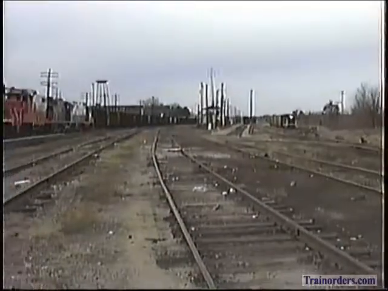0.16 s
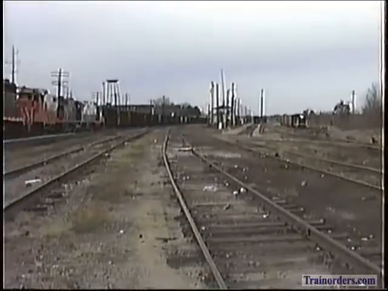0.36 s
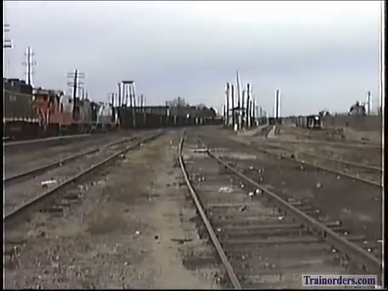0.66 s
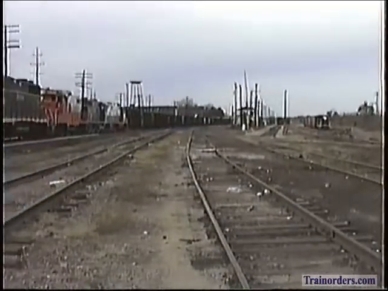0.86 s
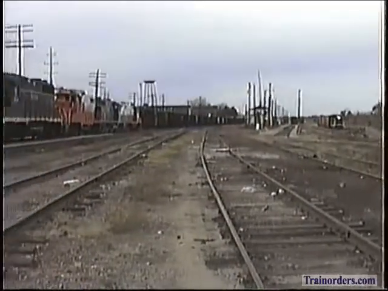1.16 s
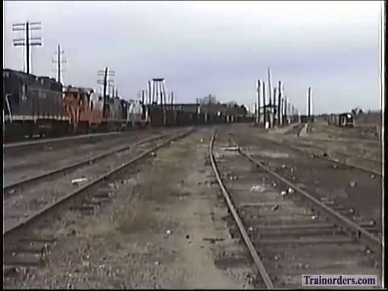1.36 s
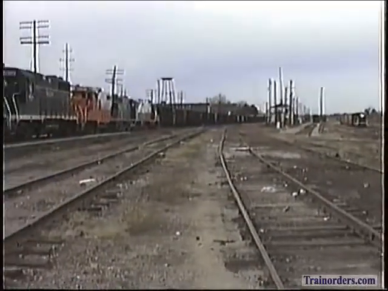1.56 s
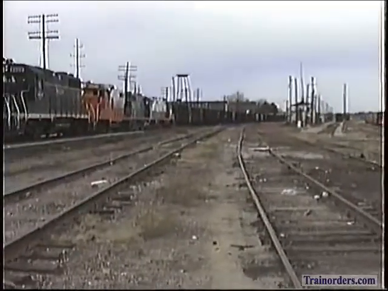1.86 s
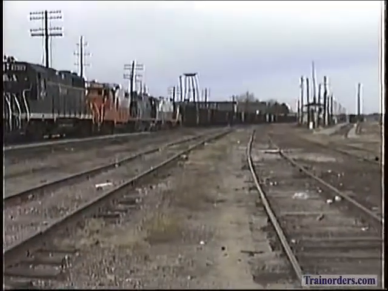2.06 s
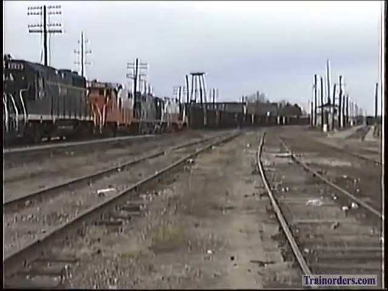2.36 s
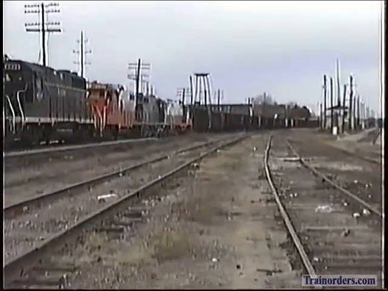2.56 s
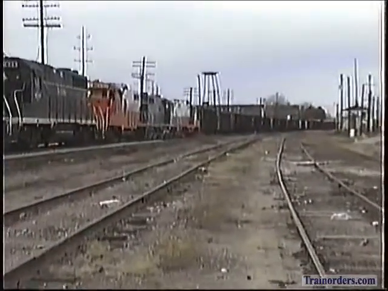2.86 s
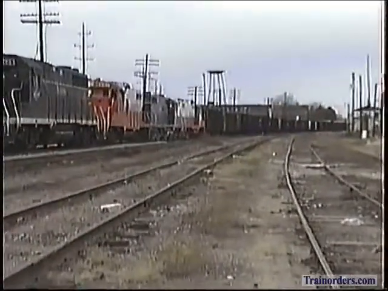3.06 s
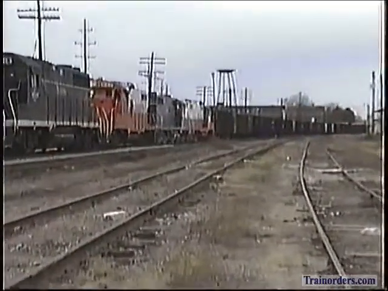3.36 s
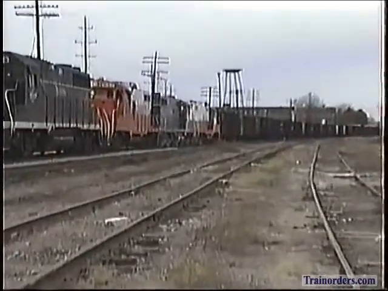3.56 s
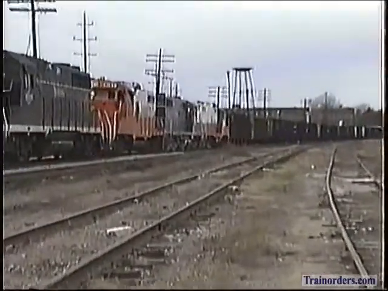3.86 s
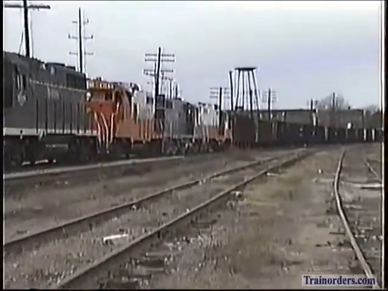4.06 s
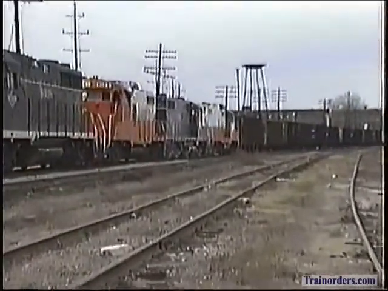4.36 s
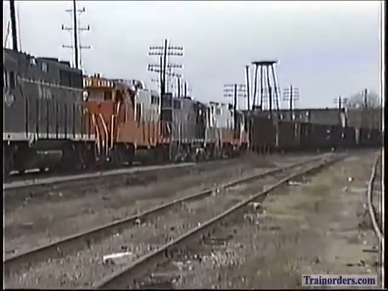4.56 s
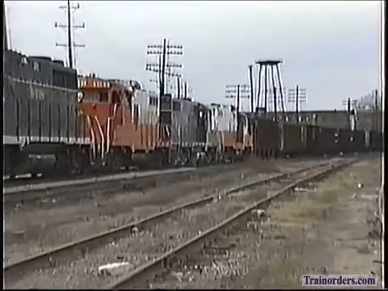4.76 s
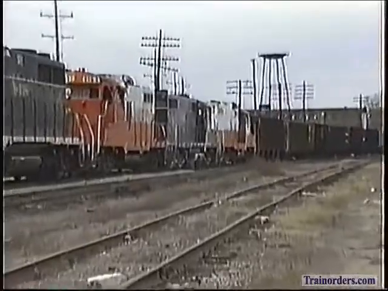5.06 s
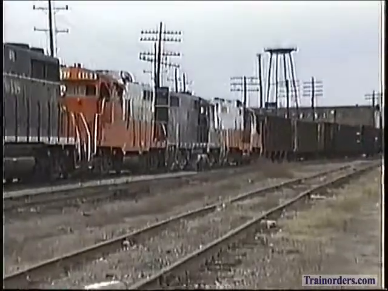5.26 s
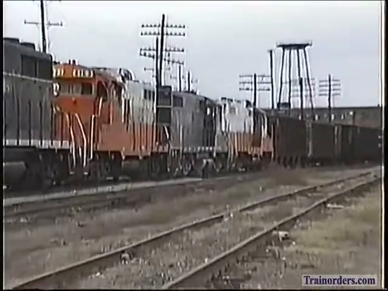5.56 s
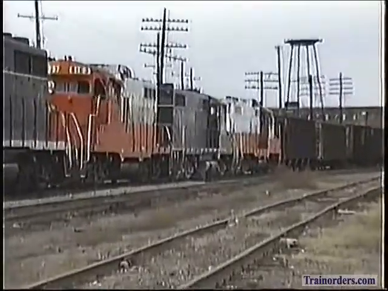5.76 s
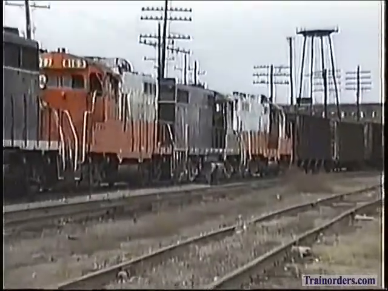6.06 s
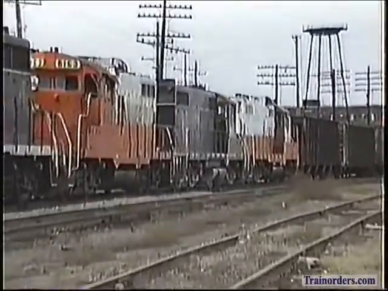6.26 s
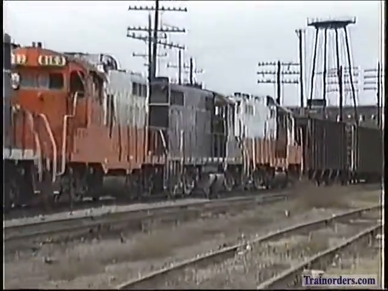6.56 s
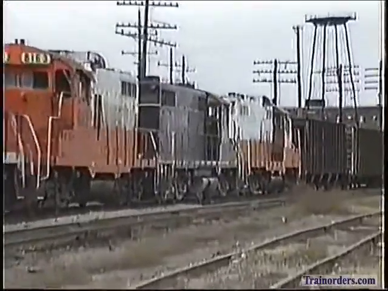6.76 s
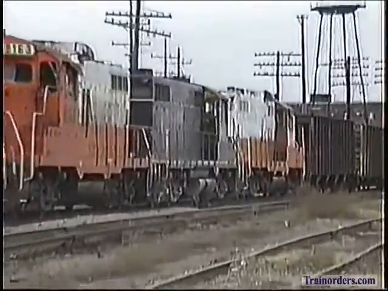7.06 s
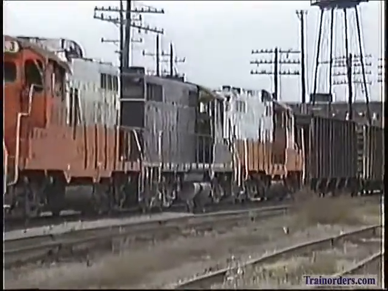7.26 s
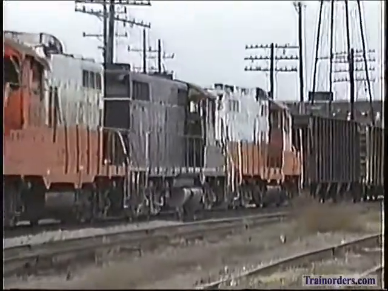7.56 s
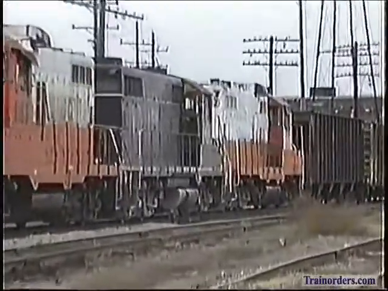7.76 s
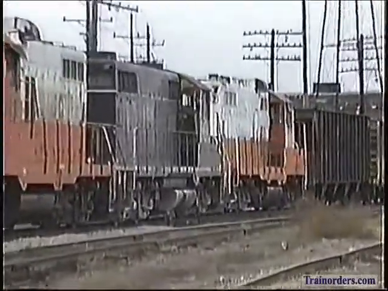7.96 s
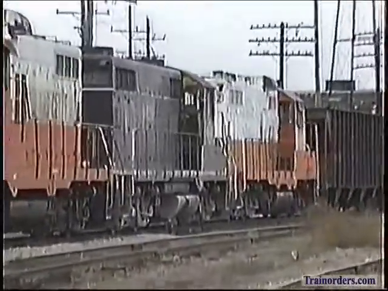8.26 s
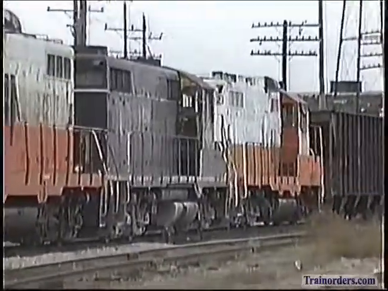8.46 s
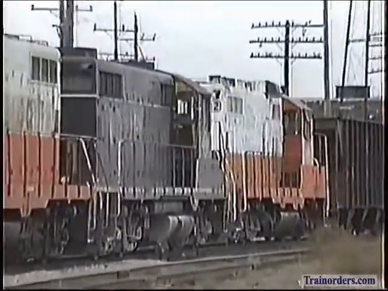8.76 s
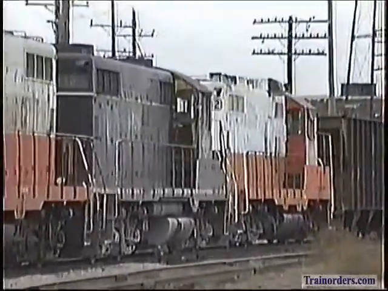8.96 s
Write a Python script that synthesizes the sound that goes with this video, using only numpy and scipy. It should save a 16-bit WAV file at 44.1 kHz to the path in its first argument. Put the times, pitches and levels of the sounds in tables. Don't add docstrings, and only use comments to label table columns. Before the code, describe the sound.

Idling diesel locomotives throb and whine with a steady chug and metallic pinging as gusty wind thumps the microphone, swelling louder as they creep nearer.

```python
import sys
import numpy as np
from scipy import signal
from scipy.fft import rfft, irfft, next_fast_len
from scipy.io import wavfile
from scipy.ndimage import uniform_filter1d, map_coordinates

SR = 44100
rng = np.random.default_rng(int(sys.argv[2]) if len(sys.argv) > 2 else 0)


def int16_out(signal):
    q = np.round(np.clip(np.atleast_2d(signal).T, -1, 1) * 32767)
    wavfile.write(sys.argv[1], SR, q.astype(np.int16))


def level_to_linear(level):
    exponent = np.asarray(level, float) / 20
    return 10 ** exponent


N = 402633

# (frequency [Hz], density [dB per Hz])
HISS_COLOUR = [(2000, -40), (4500, -1.5), (5800, .3), (8300, -.8), (10000, -2.3), (11000, -4.5),
               (12500, -5), (13780, -7)]
# (frequency [Hz], level [dB])
ELECTRONICS = [(6955, -82), (8000, -81), (8393, -82), (9351, -84), (9830, -83), (10072, -84), (12435, -88),
               (13151, -91)]
# (frequency [Hz], density [dB per Hz])
THUMP_COLOUR = [(17, -64), (28, -13.5), (40, -2), (62, -0.5), (90, -5), (125, -13), (190, -54)]
# (frequency [Hz], density [dB per Hz])
FLUTTER_COLOUR = [(60, -39), (110, 2), (150, -5), (210, -4), (280, -15), (400, -18.5), (520, -50)]
# (time [s], thump [dB], flutter [dB], half length [s])
GUSTS = [(0.073, -20, -22.5, 0.13), (0.42, -52, -27, 0.03), (0.702, -50, -35, 0.13),
         (1.087, -25.5, -26, 0.17), (1.445, -33, -55, 0.12), (1.717, -42, -35, 0.13),
         (2.11, -29, -34, 0.13), (2.27, -31, -25, 0.071), (2.55, -47, -31, .04), (2.667, -20, -41, 0.019),
         (2.7, -35, -27, 0.025), (2.842, -17.5, -26.5, 0.13), (3.02, -40, -29, 0.039),
         (3.116, -32, -38, 0.046), (3.197, -50, -34, 0.045), (3.335, -25, -43, 0.11),
         (3.567, -21, -32, 0.069), (3.777, -32, -48, 0.059), (3.895, -23, -27, 0.044),
         (4.093, -34, -39, 0.13), (4.724, -42, -35, 0.11), (4.954, -34, -46, 0.071),
         (5.106, -15.5, -24, 0.043), (5.555, -31.5, -44, 0.18), (5.9, -43, -61, 0.34),
         (6.186, -31, -52, 0.038), (6.444, -30.5, -67, 0.18), (6.838, -28, -27, 0.023),
         (7.062, -23, -26, 0.04), (7.615, -32, -36, 0.17), (7.96, -26, -29, 0.08), (8.35, -34, -50, 0.038),
         (8.54, -31, -33, 0.047), (8.67, -26, -39, 0.034), (8.745, -45, -24, .035),
         (9.014, -32, -24.5, 0.19)]
# (time of peak [s], peak level [dB], frequency [Hz])
SLAPS = [(0.032, -20, 90), (0.091, -9, 105), (0.121, -18, 71), (0.957, -13.5, 94), (1.018, -18, 72),
         (1.125, -15, 82), (1.176, -13, 80), (1.247, -28, 92), (1.293, -17, 91), (1.374, -21, 60),
         (1.48, -18, 72.5), (1.624, -22, 111), (1.759, -19, 69.5), (2.051, -17, 98), (2.142, -13, 87),
         (2.271, -18, 77), (2.582, -16, 78), (2.671, -15, 74), (2.75, -17, 71.5), (2.848, -16, 76),
         (2.958, -20, 60), (3.103, -15, 58), (3.288, -20, 73), (3.566, -15, 65), (3.644, -16, 84),
         (3.891, -19, 100), (3.989, -18, 86), (4.091, -21, 86), (4.124, -22, 103), (4.295, -19.5, 82),
         (4.559, -22, 88), (5.012, -24, 79), (5.083, -20, 103), (5.112, -13, 101), (5.524, -20, 63),
         (5.618, -23, 84), (5.699, -20, 90), (5.78, -24, 77), (6.001, -17, 68), (6.32, -14.5, 69),
         (6.496, -19, 69), (6.626, -25, 81), (6.836, -20, 86), (7.058, -21, 85), (7.09, -17, 68),
         (7.413, -24, 101), (7.56, -16.5, 96), (7.641, -25, 89), (7.885, -24, 81), (7.937, -18.5, 118),
         (8.019, -19, 87), (8.1, -22, 94), (8.356, -23, 70), (8.504, -20, 102), (8.554, -20, 114),
         (8.581, -26, 90), (8.685, -21, 75), (8.916, -17, 92), (9.069, -16, 101), (9.092, -26, 88)]
# (time of peak [s], peak level [dB], frequency [Hz])
EDGE_SWINGS = [
    (0.007, -11, 62),
    (9.13, -12, 70),
]
# (time [s], level [dB])
SCRAPES = [
    (5.75, -56),
    (5.968, -52),
    (6.19, -56),
    (6.42, -60),
]
# (time [s], level [dB])
ENGINE_LOUDNESS = [(0.03, -33.5), (0.1, -36), (1.77, -31), (2.32, -31), (2.4, -29.5), (2.73, -29.5),
                   (2.78, -33.5), (3.11, -36), (3.64, -35.5), (4.8, -32.5), (6.1, -31), (7.71, -28),
                   (8.14, -26.5), (8.67, -27), (9.1, -26)]
# (time [s], speed [rpm])
SHAFT_SPEED = [(0.9, 275.914), (2.1, 275.984), (3.3, 275.936), (4.5, 275.905), (5.7, 275.886),
               (6.9, 275.956), (8.1, 275.853)]
# (frequency [Hz], level re engine [dB], unsteadiness [dB])
FANS = [(1507, -28, 2.5), (2158.2, -33.5, 1), (1890, -35, 2), (4640, -48, 4)]
# (frequency [Hz], density [dB per Hz])
ROAR_COLOUR = [(40, -74), (130, -2), (250, -6.5), (340, -5.5), (470, -11), (590, -8.5), (720, -5),
               (860, -13.5), (1150, -12.5), (1350, -18.5), (1600, -21), (2080, -19.5), (2400, -26.5),
               (3600, -48)]
# (frequency [Hz], density [dB per Hz])
CLATTER_COLOUR = [(1200, -50), (2300, -3), (2700, 0), (3100, -1.8), (3500, -.8), (4200, -7.5), (4650, -6.5),
                  (5000, -13), (6500, -18.5), (9000, -21), (13700, -27)]
# (start [turn], length [turns], level over the clatter [dB])
PUFFS = [
    (0.352, 0.11, -5),
    (0.91, 0.065, -4.5),
    (0.523, 0.061, -9),
]
# (time [s], level over the air noise [dB])
BLASTS = [
    (2.71, -7),
    (5.1, -10),
    (5.76, -11),
    (5.96, -11),
    (6.19, -13),
    (6.42, -12),
    (9.0, -10),
]
# (turn number, level [dB])
ODD_PINGS = [(0, -8), (1, 5), (2, -7), (4, -7), (5, -14), (7, -1), (10, -9), (11, -5), (12, -2), (13, 0),
             (14, -5), (16, -12), (18, -2), (20, -6), (21, 1), (22, -9), (23, -5), (24, -14), (25, -14),
             (26, -6), (28, 2), (29, 1), (30, -12), (31, -10), (32, -14), (33, -6), (34, -5), (35, -2),
             (38, -9), (39, -7), (41, -6)]
# (multiple of shaft speed, level re engine [dB])
BLOCK_TONES = [(30, -21), (32, -17.7), (35, -22), (37, -21), (40, -21), (47, -19.5), (60, -18.8),
               (66, -20.1), (83, -19.6), (85, -19.1), (87, -20.3), (88, -22.6), (93, -21.8), (97, -21.1),
               (105, -21.5), (115, -23.1), (117, -18.4), (125, -28), (127, -23), (128, -19.9), (129, -20.8),
               (130, -22.6), (131, -21), (136, -21.5), (137, -23.2), (141, -21.3), (148, -25), (149, -27),
               (156, -19.7), (157, -25.5), (160, -24), (168, -25), (173, -23.5), (174, -22), (179, -24),
               (184, -27)]
# (frequency [Hz], level of each re engine [dB])
BLOCK_FILL = [(60, -18.5), (200, -25.5), (370, -40.5), (560, -22), (790, -38), (1050, -43.5), (1350, -39.5),
              (1700, -48.5), (2300, -63), (3500, -59), (6000, -110)]
# (multiple of shaft speed, level re engine [dB], swell [0-1], loudest at [turn], waver [rad])
GEARS = [(79, -15.3, .25, .84, 0), (151, -13.3, .45, .22, .9), (158, -22.5, .2, .39, -.7),
         (161, -13.8, .33, .99, .45)]
# (multiple of shaft speed, level re whine [dB], swell [0-1],
# loudest at [turn], waver [rad])
MESH_OVERTONES = [(237, -3.5, .45, .66, 0), (316, -.8, .3, .56, 0), (395, -10.5, .4, .64, 0),
                  (474, -12, .15, .32, 0), (553, -16, .15, .19, 0)]
# (time [s], level [dB], frequency [Hz])
GLINTS = [(1.825, -72, 14000), (1.825, -72, 14400), (2.385, -65, 14900), (6.397, -64, 14920),
          (7.298, -68, 14300), (7.49, -67, 14100), (7.49, -67, 14450), (7.49, -65, 14920),
          (8.19, -70, 14200), (8.32, -64, 14900), (9.018, -72, 14050)]
# (frequency [Hz], difference [dB])
BALANCE = [(40, 1.4), (107, .4), (260, -1.2), (690, -2), (1700, -2.4), (3200, -2), (4300, -.9), (6000, -.1),
           (14000, -.2)]
# (frequency [Hz], phase lead [rad])
PHASE_LEAD = [(40, -.16), (150, -.23), (260, -.19), (690, -.09), (1700, -.04), (6000, 0)]
# (frequency [Hz], level [dB])
UNSHARED = [(60, -24), (300, -23), (700, -26), (1700, -17), (3200, -14), (4300, -11), (6000, -14.5),
            (8000, -21), (10000, -20), (12000, -10), (13400, -12)]
OFFSET = [
    [.1231],
    [.1226],
]


def unit(x):
    return x / np.sqrt(np.mean(x ** 2) + 1e-20)


def along(points, hz):
    f, value = np.transpose(points)
    return np.interp(np.log(hz + 1), np.log(f + 1), value)


def over_time(rows):
    s, value = np.transpose(rows)
    return np.interp(np.arange(N) / SR, s, value)


def wobble(rate_hz):
    coarse = np.arange(0, N + 128, 128)
    knots = rng.standard_normal(int(N * rate_hz / SR) + 5)
    return np.interp(np.arange(N), coarse, map_coordinates(knots, [coarse * rate_hz / SR]))


def swells(s, db, half_s):
    t = np.arange(0, N + 128, 128) / SR
    bells = level_to_linear(db)[:, None] * np.exp(-((t - s[:, None]) / np.reshape(half_s, (-1, 1))) ** 2)
    return np.interp(np.arange(N) / SR, t, bells.sum(axis=0))


def filtered(x, response):
    m = next_fast_len(N + 8192)
    return irfft(rfft(x, m) * response(np.fft.rfftfreq(m, 1 / SR)), m)[..., :N]


def noise(colour):
    low_hz, high_hz = colour[0][0], colour[-1][0]

    def response(hz):
        return level_to_linear(along(colour, hz)) * (hz > low_hz) * (hz < high_hz)

    return unit(filtered(rng.standard_normal(N), response))


def even(x, seconds):
    level = np.abs(uniform_filter1d(x ** 2, int(seconds * SR))) + .05
    return unit(x / level ** .3)


def follows(level_db, share):
    return level_db + share * (over_time(ENGINE_LOUDNESS) + 33)


def tape_hiss():
    return level_to_linear(follows(-60.7, share=.4)) * noise(HISS_COLOUR)


def electronics_buzz():
    t = np.arange(N) / SR
    return sum(level_to_linear(db - 1) * np.sin(2 * np.pi * hz * t) for hz, db in ELECTRONICS)


def slaps(cycles):
    t, out = np.arange(N) / SR, np.zeros(N)
    for peak_s, db, hz in SLAPS + EDGE_SWINGS:
        start_s = peak_s - cycles / hz
        near = slice(max(round(start_s * SR), 0), round((start_s + .15) * SR))
        u = (t[near] - start_s) * hz
        envelope = u / cycles * np.exp(1 - u / cycles)
        out[near] += level_to_linear(db) * np.sin(2 * np.pi * u) * envelope
    return out


def wind():
    s, thump_db, flutter_db, half_s = np.transpose(GUSTS)
    thump_gain = level_to_linear(-32.5) + swells(s, thump_db, half_s)
    flutter_gain = level_to_linear(-35.5) + swells(s, flutter_db, half_s)
    thump = thump_gain * even(noise(THUMP_COLOUR), seconds=0.035)
    flutter = flutter_gain * even(noise(FLUTTER_COLOUR), seconds=0.0226)
    slap_s = np.transpose(SLAPS + EDGE_SWINGS)[0]
    lull = np.clip(1 - swells(slap_s, np.full(len(slap_s), -5.0), half_s=.018), .2, 1)
    return lull * (level_to_linear(-3.5) * thump + level_to_linear(-5.0) * flutter) + level_to_linear(-4) * slaps(cycles=.7)


def flange_squeal():
    at_s, half_s, pitch_hz = 4.28, .24, 2353
    t = np.arange(N) / SR
    level = level_to_linear(-57 + 2.2 * wobble(15)) * np.exp(-((t - at_s) / half_s) ** 2)
    return np.sqrt(2) * level * np.sin(2 * np.pi * pitch_hz * t + .5 * wobble(14))


def steel_scrapes():
    centre_hz, width_hz = 3200, 250
    ring = filtered(rng.standard_normal(N), lambda hz: 1 / (1 + ((hz - centre_hz) / width_hz) ** 2))
    return swells(*np.transpose(SCRAPES), half_s=.016) * unit(ring)


def fans():
    t = np.arange(N) / SR
    out = np.zeros(N)
    for hz, db, flicker_db in FANS:
        level = np.sqrt(2) * level_to_linear(db + flicker_db * wobble(4.9))
        out += level * np.sin(2 * np.pi * hz * t + .5 * wobble(6.9))
    return out


def exhaust_roar():
    return level_to_linear(-2.5 + 0.76 * wobble(15)) * noise(ROAR_COLOUR)


def clatter(turn):
    gate = 1
    for at, length, db in PUFFS:
        u = (turn - at) % 1 / length
        each_turn = level_to_linear(db + 1.3 * rng.standard_normal(64))
        strength = each_turn[(turn - at).astype(int) + 1]
        gate = gate + strength * np.e * 3 * u * np.exp(-3 * u)
    return unit(gate * noise(CLATTER_COLOUR))


def air(turn):
    blasts = 1 + swells(*np.transpose(BLASTS), half_s=.04)
    return level_to_linear(0.5) * level_to_linear(follows(-55, share=0.91)) * blasts * clatter(turn)


def ping(turn, at, hz, t60, odd):
    strength_db = 2.0 * rng.standard_normal(64)
    number, db = np.transpose(odd)
    strength_db[number] = db
    when = np.flatnonzero(np.diff(np.floor(turn - at)) > 0)
    blows = np.zeros(N)
    blows[when] = level_to_linear(strength_db)[np.round(turn[when] - at).astype(int)]
    t = np.arange(SR // 8) / SR
    ring = np.sin(2 * np.pi * hz * t) * level_to_linear(-60 * t / t60) * (1 - np.exp(-t / 0.0055))
    return signal.fftconvolve(blows, ring)[:N]


def loose_steel(turn):
    struck = ping(turn, at=.843, hz=2100, t60=.045, odd=ODD_PINGS)
    lighter = ping(turn, at=.52, hz=2170, t60=.04, odd=[(14, 6)])
    lighter = lighter + ping(turn, at=.02, hz=2050, t60=.04, odd=[(0, 0)])
    return level_to_linear(2.0) * struck + level_to_linear(-5.5) * lighter


def geared(rows, turn, drift_db, fades):
    t = np.arange(N) / SR
    flex = .0002 * wobble(12)
    uneven = np.cos(2 * np.pi * (turn - .69))
    out = np.zeros(N)
    for (multiple, db, depth, at, waver), fade in zip(rows, fades):
        level = level_to_linear(db - fade * t + drift_db * wobble(3.28))
        swell = 1 + depth * np.cos(2 * np.pi * (turn - at))
        phase = 2 * np.pi * multiple * (turn + flex) + waver * uneven
        out += level * swell * np.sqrt(2) * np.cos(phase)
    return out


def mesh_whine(turn):
    tones = geared(MESH_OVERTONES, turn, drift_db=1.3, fades=[0, .38, .25, .45, .35])
    return level_to_linear(follows(-48.9, share=1.0)) * tones


def block(turn, tones_db, fill_db, change):
    size = 4096
    k = np.arange(size // 2 + 1)
    shaft_hz = np.mean(np.transpose(SHAFT_SPEED)[1]) / 60
    fill = level_to_linear(along(BLOCK_FILL, k * shaft_hz) + fill_db) * (k > 6)
    chance = rng.standard_normal((2, 2, len(k)))
    lines = fill * (chance[0] + 1j * chance[1]) / np.sqrt(2)
    for multiple, db in BLOCK_TONES:
        lines[0, multiple] = level_to_linear(db + tones_db) * np.exp(1j * np.angle(lines[0, multiple]))
    cycles = irfft(lines, size) * size / np.sqrt(2)
    steady, other = (map_coordinates(c, [turn % 1 * size], mode="grid-wrap") for c in cycles)
    return steady + change * wobble(0.812) * other


def locomotives():
    turn = np.cumsum(over_time(SHAFT_SPEED) / 60) / SR
    tones = block(turn, tones_db=1, fill_db=-1.0, change=0.41)
    tones = tones + geared(GEARS, turn, drift_db=2.5, fades=[0.13, 0, 0, 0])
    body = exhaust_roar() + fans() + tones + loose_steel(turn)
    return level_to_linear(over_time(ENGINE_LOUDNESS)) * body + air(turn) + mesh_whine(turn)


def scene():
    wheels = flange_squeal() + steel_scrapes()
    return np.tile(wind() + wheels + locomotives(), (2, 1))


def patchy_treble(x, from_hz, share, scatter_db):
    hz, _, z = signal.stft(x, SR, nperseg=1024)
    cells = (len(hz) // 3 + 1, z.shape[1] // 5 + 1)
    lost_share = share * np.linspace(0, 2, cells[0])[:, None]
    gain = level_to_linear(scatter_db * rng.standard_normal(cells)) * (rng.random(cells) > lost_share)
    gain = np.kron(gain, np.ones((3, 5)))[:len(hz), :z.shape[1]]
    return signal.istft(z * np.where(hz[:, None] > from_hz, gain, 1), SR, nperseg=1024)[1][:N]


def treble_glints():
    t = np.arange(N) / SR
    return sum(level_to_linear(db) * np.exp(-((t - s) / .012) ** 2) * np.sin(2 * np.pi * hz * t) for s, db, hz in GLINTS)


def tape_dropout(x):
    at_s, half_s, share, corner_hz = .292, .02, .42, 1200
    lifted = share * np.exp(-((np.arange(N) / SR - at_s) / half_s) ** 2)
    return x - lifted * filtered(x, lambda hz: hz ** 2 / (hz ** 2 + corner_hz ** 2))


def two_channels(mono):
    sign = np.array([[.5], [-.5]])

    def colour(hz):
        return level_to_linear(sign * along(BALANCE, hz)) * np.exp(1j * sign * along(PHASE_LEAD, hz))

    z = signal.stft(mono, nperseg=512)[2]
    scrambled = signal.istft(z * np.exp(2j * np.pi * rng.random(z.shape)), nperseg=512)[1][:N]
    apart = filtered(scrambled, lambda hz: level_to_linear(along(UNSHARED, hz)))
    return filtered(mono, colour) + 2 * sign * apart


def low_pass(x):
    return signal.sosfilt(signal.butter(12, 15000, fs=SR, output="sos"), x)


def record(dry):
    held = dry[0] / (1 + np.abs(dry[0] / .33) ** 6) ** (1 / 6)
    mono = patchy_treble(held + tape_hiss() + electronics_buzz(), from_hz=5800, share=.11, scatter_db=1.2)
    mono = filtered(mono, lambda hz: hz < 13780) + treble_glints()
    mono = tape_dropout(mono)
    return low_pass(two_channels(mono) + np.array(OFFSET))


dry = scene()
out = record(dry)
int16_out(out)
```